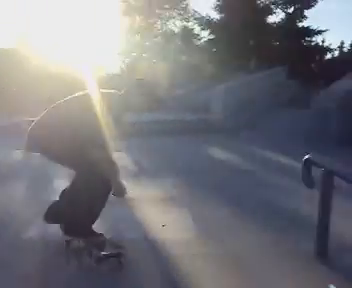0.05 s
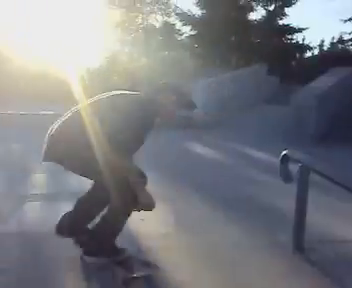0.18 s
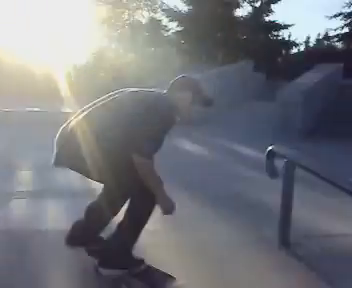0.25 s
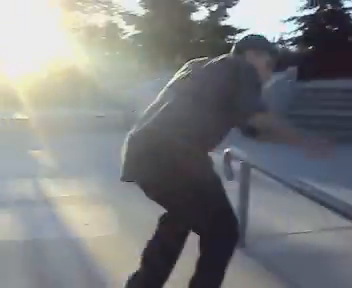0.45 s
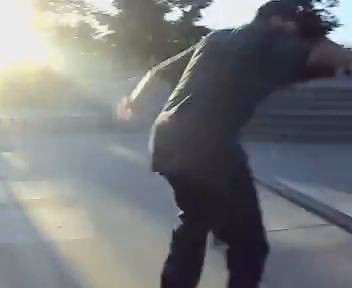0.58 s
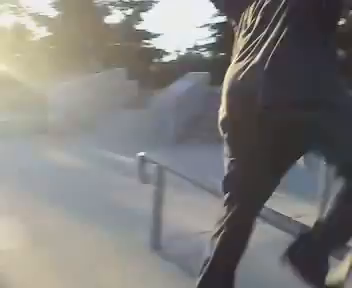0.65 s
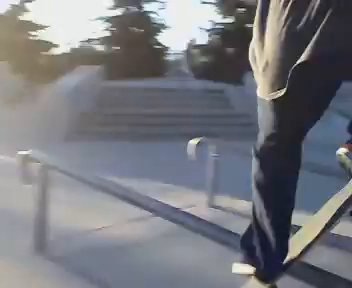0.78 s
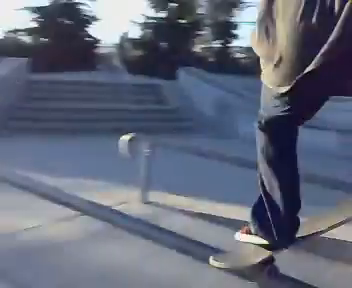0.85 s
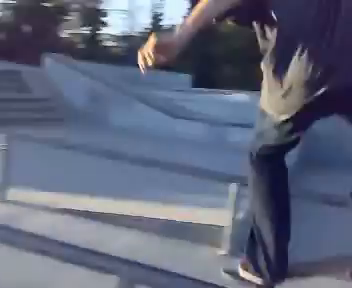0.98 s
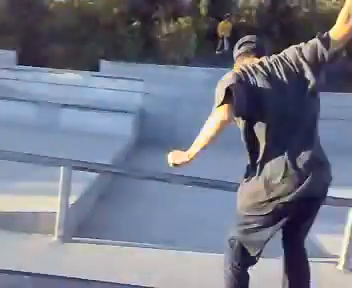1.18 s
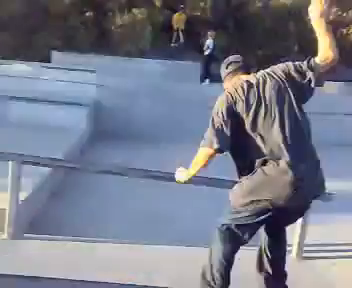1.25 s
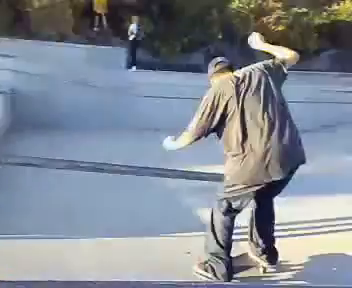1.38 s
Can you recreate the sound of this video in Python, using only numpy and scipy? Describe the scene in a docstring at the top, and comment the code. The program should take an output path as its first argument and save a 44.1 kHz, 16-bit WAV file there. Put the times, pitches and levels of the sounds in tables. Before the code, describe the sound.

Close by in a concrete skate park, skateboard wheels rumble and a sharp pop rings out. The rolling grows louder until the deck lands with a hard, slightly distorted smack, followed by lighter clacks and a brief scrape.

```python
"""A concrete skate park, close on a moving skateboard. Grit makes the wheels roar over a low rumble and
the hum of the loaded deck. The tail pops; the wheels sing, thump over bumps and hiss as they slip.
Then the deck slams down hard enough to overload the microphone, with lighter clacks and scrapes of
wood and metal trucks before and after. The ramps answer with a short echo."""
import sys
import numpy as np
from scipy import signal
from scipy.fft import rfft, irfft, next_fast_len
from scipy.io import wavfile
from scipy.ndimage import map_coordinates

SR = 44100
rng = np.random.default_rng(int(sys.argv[2]) if len(sys.argv) > 2 else 0)


def transcribe(signal):
    """Save signal, clipped to [-1, 1], as a 16-bit WAV file at the path in sys.argv[1]."""
    frames = np.atleast_2d(signal).T
    limited = np.clip(frames, -1, 1)
    pcm = np.round(limited * 32767).astype(np.int16)
    wavfile.write(sys.argv[1], SR, pcm)


N = 61739

# swell of the wheel roar: time_s, level_db
ROAR_LEVEL = [(0, -36.5), (.2, -35), (.34, -33), (.6, -31.5), (.75, -30), (.83, -25.5), (.93, -28),
              (1.02, -31), (1.07, -37), (1.2, -38), (1.4, -37)]
# wheels on concrete, rolling lightly and rolling hard: frequency_hz, level_db
LIGHT_ROAR_COLOUR = [(200, 0), (470, -19), (760, 2.5), (1100, -1), (1800, -0.5), (2050, -5), (2380, -7.5),
                     (2800, -18), (3700, -23), (5300, -18.5), (6200, -24.5), (7400, -27.5)]
HARD_ROAR_COLOUR = [(200, -8.5), (500, -8), (760, 2.5), (1000, 2.5), (1250, -5.5), (1700, -1), (2400, -5),
                    (3200, -26), (4200, -30.5), (5500, -22.5), (7400, -42.5)]
# swells of the low rumble and the deck's drone: time_s, level_db
RUMBLE_LEVEL = [(0, -35.5), (.25, -32.5), (.45, -31.5), (.57, -33), (.72, -29), (.88, -30.5), (.98, -30.5),
                (1.12, -29.5), (1.4, -29)]
DRONE_LEVEL = [(0, -34.5), (.16, -40), (.32, -35), (.55, -36), (.65, -35), (.83, -34.5), (.92, -38),
               (1.08, -42.5), (1.4, -49)]
# tone of the rumble and the drone: frequency_hz, level_db
RUMBLE_COLOUR = [(20, -31.5), (35, -9.5), (53, 3), (68, -7), (88, 4), (120, -5), (180, -6), (270, -19),
                 (450, -30.5), (1200, -65.5)]
DRONE_COLOUR = [(100, -23.5), (170, -7), (255, 4), (320, -4), (405, -2.5), (490, -8), (600, -2.5),
                (720, -6.5), (1100, -40.5)]
# ring of the tail, the deck and the trucks: pitch_hz, level_db, t60_s
TAIL_MODES = [(1380, -5, .075), (3160, -9, 0.062), (4220, -8.5, 0.044), (4810, -7, 0.039),
              (5260, -0.5, 0.037), (5940, -9.5, 0.043)]
DECK_MODES = [(354, -16.5, 0.043), (739, -15.5, 0.035), (1075, -23, 0.052), (1433, -14.5, 0.037),
              (1660, -29.5, 0.12), (1757, -7.5, 0.038), (2123, -10.5, 0.029), (2343, -20, 0.044)]
TRUCK_MODES = [(3170, -11.5, 0.021), (4544, -9.5, 0.052), (4980, -12.5, 0.04), (5390, -8.5, 0.081),
               (5640, -14.5, 0.079)]
# clacks of the board: start_s, wood_db, metal_db, length_ratio, pitch_ratio
CLACKS = [(0.2437, -22.5, -20.5, 1.24, 1.06), (0.3159, -17, -41, 0.17, 1.38),
          (0.339, -32.5, -29, 1.2, 1.02), (0.9472, -12, -2.5, 0.64, 1.084), (0.9591, -11.5, -9, 0.64, 1.07),
          (0.9718, -40, -24.5, 0.63, 0.81), (0.9899, -23.5, -14, 0.5, 0.85), (1.0009, -30.5, -39, 1.4, 1.1),
          (1.0198, -23, -37, 0.82, 1.21), (1.0875, -20, -14.5, 1.2, .96), (1.1020, -26, -17.5, 1.02, 1),
          (1.119, -25, -39, 1.3, 1.2), (1.134, -36, -25.5, 0.82, 1.6)]
# rattle of struck wood and metal: frequency_hz, level_db
WOOD_COLOUR = [(150, -17), (350, -10), (520, -10.5), (750, -1.5), (1050, -8), (1560, 2.5), (1850, 0.5),
               (2150, -9), (2900, -12.5), (4500, -18)]
METAL_COLOUR = [(1500, -33.5), (2700, -5), (3500, -5.5), (4500, 3.5), (4900, 0), (5350, 4.5), (5850, -4),
                (6400, -11), (7400, -12)]
# brief scrapes of the board: start_s, length_s, level_db
SCRAPES = [(0.253, 0.061, -33.5), (0.631, 0.1, -47), (0.957, 0.055, -66), (1.109, 0.065, -36)]
# decay of the echo off the ramps: frequency_hz, t60_s
RAMP_DECAY = [(200, 0.13), (1500, 0.88), (5000, 0.69), (9000, 0.51)]
# wheels hitting bumps: start_s, level_db, pitch_hz
THUMPS = [(.403, -13, 820), (0.406, -15.5, 246), (0.425, -15, 93.5), (0.497, -13, 270),
          (0.858, -14.5, 89.6)]
# swells of the sideways wheel hiss: time_s, level_db
SCRUB_LEVEL = [(.56, -66), (.66, -51), (.705, -40), (.745, -60.5), (.85, -50), (.905, -34), (.935, -40),
               (.99, -63)]
# tone of that hiss: frequency_hz, level_db
SCRUB_COLOUR = [(3500, -24), (4900, -15), (5450, 0), (5950, -1.5), (6300, -8.5), (7400, -18)]
# the rider's weight coming down: start_s, level_db, tilt_db_per_octave
LANDINGS = [(.9590, -13.5, -7), (.9905, -33, 10), (1.0885, -27.5, 7), (1.1150, -19, -5)]
# ring of the deck under that weight: pitch_hz, level_db, t60_s
LOADED_DECK_MODES = [(745, -4.5, 0.096), (1562, -1.5, 0.14), (1630, -16, 0.06), (2060, -1, 0.045)]
# steep treble cut above 7.4 kHz that dulls the whole sound: frequency_hz, gain_db
TREBLE_CUT = [(7400, 0), (7900, -17), (8800, -20), (9400, -70)]
# gentle treble dip after the overload: frequency_hz, gain_db
TREBLE_DIP = [(7000, 0), (9000, -6), (16000, -3)]

GRIT_PER_S = 1400
WOOD_T60_S, METAL_T60_S = .086, .031
SNAP_ATTACK_S, DECK_ATTACK_S = .0003, .002


def amp(db):
    return 10 ** (np.asarray(db) / 20)


def unit(x):
    """x at rms 1."""
    return x / np.sqrt(np.mean(x ** 2) + 1e-20)


def along(points, hz):
    """(frequency_hz, value) points read on a log axis."""
    knots_hz, values = np.transpose(points)
    return np.interp(np.log(hz + 1), np.log(knots_hz + 1), values)


def curve(points):
    """(time_s, value) points drawn out to one value per sample."""
    return np.interp(np.arange(N) / SR, *np.transpose(points))


def wobble(knots_per_s):
    """A smooth random drift."""
    return map_coordinates(rng.standard_normal(1000), [np.arange(N) * knots_per_s / SR], mode="mirror")


def filtered(x, response):
    """x through an EQ whose gain is response(hz)."""
    size = next_fast_len(len(x) + 8192)
    return irfft(rfft(x, size) * response(np.fft.rfftfreq(size, 1 / SR)), size)[:len(x)]


def coloured(x, colour):
    """x shaped by a tone colour, at rms 1."""
    return unit(filtered(x, lambda hz: amp(along(colour, hz))))


def burst(colour, t, t60, pitch=1):
    """Decaying noise: a dense cluster of resonances dying together."""
    return coloured(rng.standard_normal(len(t)), np.multiply(colour, [pitch, 1])) * amp(-60 * t / t60)


def ring(modes, t):
    """Damped modes struck together, neighbours swinging in opposite directions."""
    return sum((-1) ** k * amp(db - 60 * t / t60) * np.sin(2 * np.pi * hz * t)
               for k, (hz, db, t60) in enumerate(modes))


def attack(t, rise_s):
    return 1 - np.exp(-t / rise_s)


def add(track, start_s, sound):
    part = track[round(start_s * SR):][:len(sound)]
    part += sound[:len(part)]


def wheel_roar(grit_share=.27, light_db=-31, hard_db=-28):
    """Grit in the concrete shakes wheels and deck; the louder roll crossfades to the hard colour."""
    level_db = curve(ROAR_LEVEL)
    grit = unit((rng.random(N) < GRIT_PER_S / SR) * rng.standard_normal(N))
    ground = np.sqrt(grit_share) * grit + np.sqrt(1 - grit_share) * rng.standard_normal(N)
    hard = np.clip((level_db - light_db) / (hard_db - light_db), 0, 1)
    roar = (1 - hard) * coloured(ground, LIGHT_ROAR_COLOUR) + hard * coloured(ground, HARD_ROAR_COLOUR)
    return roar * amp(level_db + .8 * wobble(45.34))


def rumble():
    """Wheels and moving air lay down a low, lumpy bed."""
    level_db = curve(RUMBLE_LEVEL) + .62 * wobble(20.1)
    return coloured(rng.standard_normal(N), RUMBLE_COLOUR) * amp(level_db)


def deck_drone():
    """The deck hums under the rider's weight and falls away after the slam."""
    level_db = curve(DRONE_LEVEL) + 1.8 * wobble(34.96)
    return coloured(rng.standard_normal(N), DRONE_COLOUR) * amp(level_db)


def tail_pop(start_s=.2405, level_db=-18, crack_db=.5):
    """The tail cracks against the concrete and rings brightly."""
    track, t = np.zeros(N), np.arange(SR // 4) / SR
    crack = amp(crack_db) * burst(METAL_COLOUR, t, t60=.014)
    add(track, start_s, amp(level_db) * (ring(TAIL_MODES, t) + crack) * attack(t, SNAP_ATTACK_S))
    return track


def clacks(deck_ring_db=-8, truck_ring_db=-3):
    """A wooden knock and a bright snap of the trucks, the rattle pitched by where the board is hit."""
    track, t = np.zeros(N), np.arange(SR // 4) / SR
    for start_s, wood_db, metal_db, length, pitch in CLACKS:
        choke = amp(-60 * t / METAL_T60_S * max(1 / length - 1, 0))  # short clacks ring less
        wood = burst(WOOD_COLOUR, t, WOOD_T60_S * length, pitch)
        wood += amp(deck_ring_db) * ring(DECK_MODES, t) * choke
        metal = burst(METAL_COLOUR, t, METAL_T60_S * length, pitch)
        metal += amp(truck_ring_db) * ring(TRUCK_MODES, t) * choke
        add(track, start_s, (amp(wood_db) * wood + amp(metal_db) * metal) * attack(t, SNAP_ATTACK_S))
    return track


def scrapes(hiss_gain=.09):
    """The board scrapes with a gritty, metallic sizzle that swells and fades."""
    track = np.zeros(N)
    for start_s, length_s, level_db in SCRAPES:
        n = round(length_s * SR)
        grit = (rng.random(n) < GRIT_PER_S / SR) * rng.standard_normal(n)
        hiss = hiss_gain * rng.standard_normal(n)
        swell = np.sin(np.pi * np.arange(n) / n)
        add(track, start_s, amp(level_db) * coloured(grit + hiss, METAL_COLOUR) * swell)
    return track


def ramp_echo(send, predelay_s=.019):
    """The concrete ramps scatter a short reverb that hangs longest in the mids."""
    hz, t, bands = signal.stft(rng.standard_normal(SR * 3 // 4), SR, nperseg=256)
    decay = amp(-60 * t / along(RAMP_DECAY, hz)[:, None])
    impulse = signal.istft(bands * decay, SR, nperseg=256)[1]
    delayed = np.pad(send, (round(predelay_s * SR), 0))
    return signal.fftconvolve(delayed, impulse / np.linalg.norm(impulse))[:N]


def wheel_whine(start_s=.4, end_s=.72, pitch_hz=2296, wander_hz=42, flutter_db=3, under_roar_db=12):
    """The spinning wheels sing one unsteady note, tucked under the roar."""
    hz = pitch_hz + wander_hz * wobble(70)
    tone = unit(np.sin(2 * np.pi * np.cumsum(hz) / SR) * amp(flutter_db * wobble(70)))
    t = np.arange(N) / SR
    arch = np.sqrt(np.clip(4 * (t - start_s) * (end_s - t) / (end_s - start_s) ** 2, 0, 1))
    return tone * arch * amp(curve(ROAR_LEVEL) - under_roar_db)


def wheel_thumps(rise_cycles=1, t60_cycles=13):
    """Each bump in the concrete shakes the loaded board for a few cycles."""
    track, t = np.zeros(N), np.arange(SR // 4) / SR
    for start_s, level_db, pitch_hz in THUMPS:
        cycles = pitch_hz * t
        envelope = amp(level_db - 60 * cycles / t60_cycles) * attack(t, rise_cycles / pitch_hz)
        add(track, start_s, envelope * np.sin(2 * np.pi * cycles))
    return track


def wheel_scrub():
    """The wheels hiss as they slip sideways."""
    return coloured(rng.standard_normal(N), SCRUB_COLOUR) * amp(curve(SCRUB_LEVEL) + wobble(130))


def deck_slam(start_s=.9482, level_db=10, crack_db=-18):
    """The deck hits the ground flat and rings in its wooden modes."""
    track, t = np.zeros(N), np.arange(SR // 4) / SR
    wood = ring(DECK_MODES, t) + amp(crack_db) * burst(WOOD_COLOUR, t, WOOD_T60_S)
    add(track, start_s, amp(level_db) * wood * attack(t, DECK_ATTACK_S))
    return track


def rider_landings():
    """The rider's weight comes down and the deck rings hollow, each contact darker or brighter."""
    track, t = np.zeros(N), np.arange(SR // 4) / SR
    lowest_hz = LOADED_DECK_MODES[0][0]
    for start_s, level_db, tilt in LANDINGS:
        modes = [(hz, db + tilt * np.log2(hz / lowest_hz), t60) for hz, db, t60 in LOADED_DECK_MODES]
        add(track, start_s, amp(level_db) * ring(modes, t) * attack(t, DECK_ATTACK_S))
    return track


def scene(send_db=-14, pop_trim_db=-3.5, slam_send_db=-22):
    """A dry rolling bed under the hits and scrapes, which also feed the echo."""
    slam, pop = deck_slam(), tail_pop()
    clatter = clacks() + rider_landings() + scrapes()
    # the pop echoes less, so its bright ring stays short
    echo = ramp_echo(amp(send_db) * (clatter + amp(pop_trim_db) * pop) + amp(slam_send_db) * slam)
    rolling = wheel_roar() + deck_drone() + wheel_whine() + wheel_scrub() + rumble() + wheel_thumps()
    return (rolling + slam + pop + clatter + echo)[None]


def record(dry):
    """A steep treble cut dulls the sound; the slam clips, its edge softened and the very top cut off."""
    ceiling, knee_hardness, top_hz = .72, 24, 16200
    dull = filtered(dry[0], lambda hz: amp(along(TREBLE_CUT, hz)))
    clipped = dull / (1 + np.abs(dull / ceiling) ** knee_hardness) ** (1 / knee_hardness)
    return filtered(
        clipped, lambda hz: amp(along(TREBLE_DIP, hz)) / np.sqrt(1 + (hz / top_hz) ** 120))[None]


dry = scene()
out = record(dry)
transcribe(out)
```